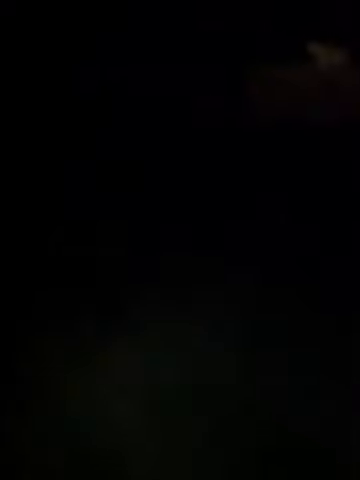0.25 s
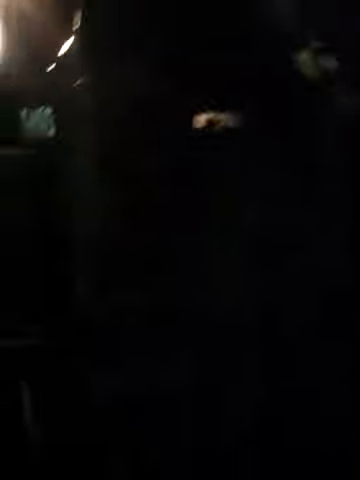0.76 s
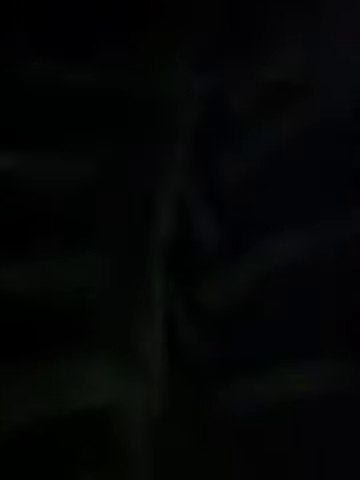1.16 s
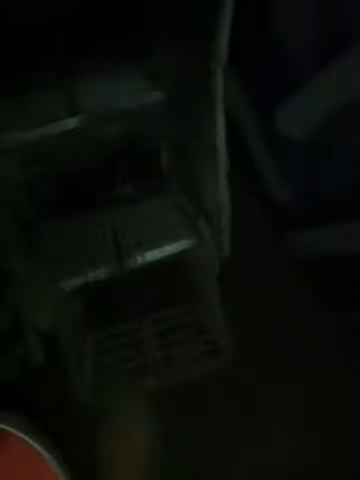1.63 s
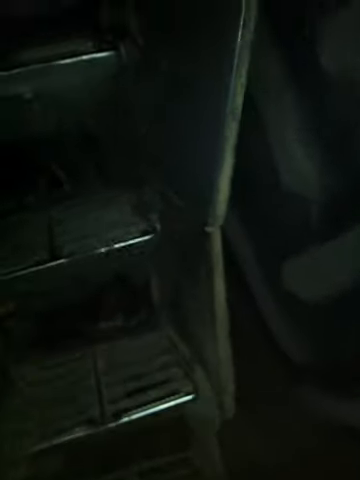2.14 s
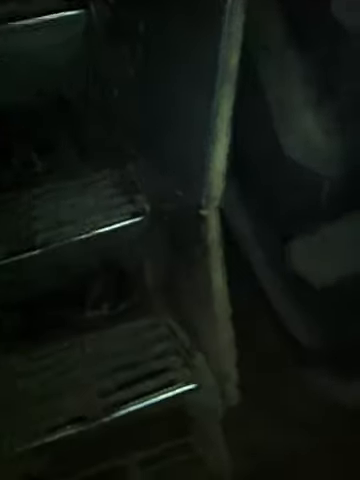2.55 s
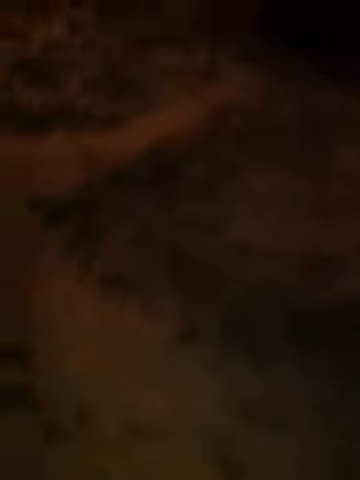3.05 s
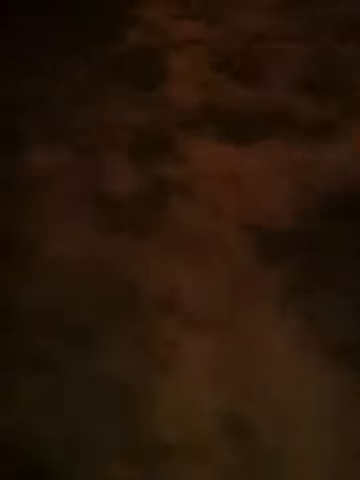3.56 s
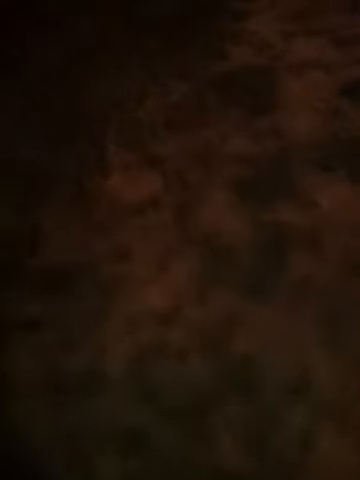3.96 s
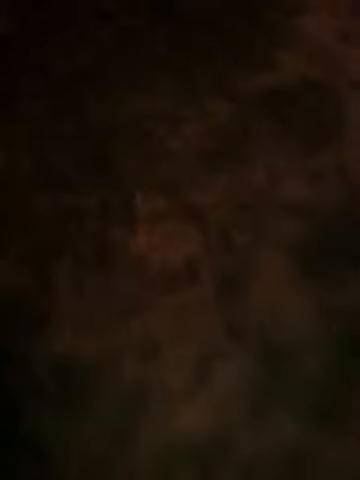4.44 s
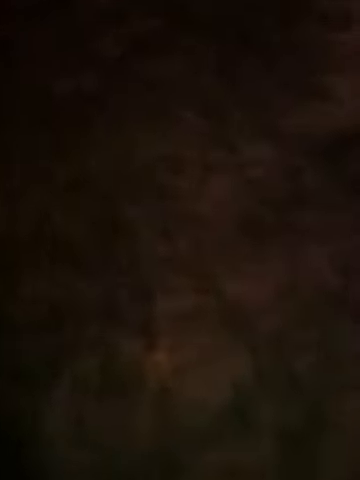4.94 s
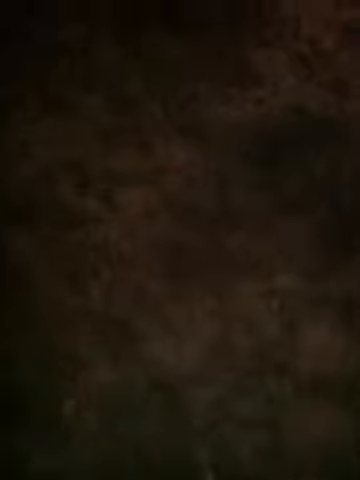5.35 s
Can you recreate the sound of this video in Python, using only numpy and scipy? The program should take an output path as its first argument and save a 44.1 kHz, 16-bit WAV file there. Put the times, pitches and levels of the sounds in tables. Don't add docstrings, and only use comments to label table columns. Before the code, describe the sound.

A diesel tractor hammers loudly up close with metallic clatter, drops to silence around three seconds, then fades back duller and speeds up.

```python
import sys
import numpy as np
from scipy import signal
from scipy.fft import rfft, irfft
from scipy.io import wavfile
from scipy.ndimage import uniform_filter1d

SR = 44100
rng = np.random.default_rng(int(sys.argv[2]) if len(sys.argv) > 2 else 0)


def generate_wav(signal):
    frames = np.transpose(np.atleast_2d(signal))
    scaled = np.clip(frames, -1, 1) * 32767
    pcm = np.round(scaled).astype(np.int16)
    wavfile.write(sys.argv[1], SR, pcm)


def nominal_scale(level):
    x = np.asarray(level, float) / 20
    return 10 ** x


N = 246958
BACK_S = 3.5915


def read(points, hz):
    f, value = np.transpose(points)
    return np.interp(np.log(hz + 1), np.log(f + 1), value, left=-80, right=-80)


def evened(x):
    return x / np.sqrt(np.mean(x ** 2) + 1e-20)


def drift(hz):
    z = rfft(rng.standard_normal(N))
    return evened(irfft(z / (1 + (np.fft.rfftfreq(N, 1 / SR) / hz) ** 2), N))


def roar(colour, patchy_db, wide_bins, long_frames):
    frames = N // 128 + 5
    a, b, patches = rng.standard_normal((frames, 257, 3)).T
    patches = uniform_filter1d(patches, wide_bins, 0)
    patches = evened(uniform_filter1d(patches, long_frames, 1))
    spectra = (a + 1j * b) * nominal_scale(patchy_db * patches)
    x = signal.istft(spectra, nperseg=512, noverlap=384)[1][:N]
    gain = nominal_scale(read(colour, np.fft.rfftfreq(N, 1 / SR)))
    return evened(irfft(rfft(x) * gain, N))


def tones(orders, turns, waver_db, blur_cycles):
    total = np.zeros(N)
    for order, db in orders:
        level = np.sqrt(2) * nominal_scale(db + waver_db * drift(6.7))
        total += level * np.cos(2 * np.pi * (order * turns + blur_cycles * drift(3.2)))
    return total


def bursts(turns, depth, decay_cycles, spread_db):
    strength = nominal_scale(spread_db * rng.standard_normal(400))[turns.astype(int)]
    burst = strength * np.exp(-((turns % 1) / decay_cycles) ** 2)
    burst = uniform_filter1d(burst, size=240)
    return evened(1 - depth + depth * burst / burst.mean())


def ringing(hz, db, width_hz, steady=0.4):
    r = np.exp(-np.pi * width_hz / SR)
    a, b = rng.standard_normal((N, 2)).T
    slow = a + 1j * b
    for _ in range(2):
        slow = signal.lfilter([1 - r], [1, -r], slow)
    slow = slow / (abs(slow) + 1e-9) ** steady
    return nominal_scale(db) * evened((slow * np.exp(2j * np.pi * np.cumsum(hz) / SR)).real)


def beside(ring, close):
    hz, more_hz, db, more_db = ring
    return hz + more_hz * close, db + more_db * close


def swell(t, start_s, length_s):
    k = np.clip(np.searchsorted(start_s, t) - 1, 0, None)
    phase = np.clip((t - start_s[k]) / length_s[k], 0, 1)
    return k, abs(np.sin(np.pi * phase))


def mudguard(turns, close, behind):
    hiss = ringing(np.full(N, 4940), -28 + 9 * (close - 0.5), width_hz=500, steady=0.1)
    return behind * hiss * bursts(turns + 0.77, 0.6, 0.62, 1.5)


def shakes(t):
    # (start [s], length [s], pitch [Hz], level [dB rms])
    events = [(.081, 0.021, 5850, -18.5), (.23, 0.024, 5830, -17.5), (.332, 0.014, 5680, -22.5),
              (.729, 0.016, 5470, -16.5), (.78, .02, 5000, -16), (.953, .02, 4520, -19.5),
              (1.38, .03, 4760, -16), (1.48, .02, 5640, -17), (2.149, 0.027, 4580, -14.5),
              (2.423, .02, 4770, -18), (2.595, .02, 4600, -20.5), (2.65, 0.059, 5200, -14),
              (2.745, .015, 4470, -19.5), (5.158, 0.022, 4980, -16)]
    start_s, length_s, hz, db = np.transpose(events)
    k, rise = swell(t, start_s, length_s)
    return np.sqrt(rise) * ringing(hz[k], db[k], 300)


def rattles(turns, view, behind):
    low_hz, high_hz = 4340, 6200
    pitch, size = rng.random((400, 2)).T
    cycle = (turns + 0.9).astype(int)
    hz = (low_hz + (high_hz - low_hz) * pitch)[cycle]
    strength = nominal_scale(2.8 * np.minimum(-np.log(size + 1e-6), 3.5))[cycle]
    shake = uniform_filter1d(strength * np.exp(-((turns + 0.9) % 1) / 0.5), size=110)
    buzz = drift(250) + 1j * drift(250)
    sheet = evened(shake * (buzz * np.exp(2j * np.pi * np.cumsum(hz) / SR)).real)
    return nominal_scale(-25 + 3.5 * (view - 1) - 3 * behind) * sheet


def gap(t):
    # (start [s], end [s], pitch [Hz], level [dB rms])
    places = [
        (.1, 1.3, 239.9, -20.5),
        (1.45, 2.95, 399.3, -25.5),
        (3.697, 4.95, 390.7, -25.5),
        (5.049, 5.7, 487, -22),
    ]
    start_s, end_s, hz, db = np.transpose(places)
    k, rise = swell(t, start_s, end_s - start_s)
    return rise ** 0.6 * ringing(hz[k], db[k], 30)


def hollow(close, behind):
    # (pitch far from the steps [Hz], gained beside them [Hz], level far [dB rms], gained [dB])
    ring = (316., 28., -22, 3.5)
    hz, db = beside(ring, close)
    return ringing(hz + 14 * drift(2.51), db - 3 * behind, 38)


def pump(close, behind):
    # (pitch far from the steps [Hz], gained beside them [Hz], level far [dB rms], gained [dB])
    ring = (175., 2.5, -40, 21)
    return ~behind * ringing(*beside(ring, close), 7.4)


def panel(turns, close):
    # (pitch far from the steps [Hz], gained beside them [Hz], level far [dB rms], gained [dB])
    ring = (1300.5, -8.5, -44.5, 26.5)
    return ringing(*beside(ring, close), 60) * bursts(turns + 0.87, 0.94, 0.4, 1.7)


def fan(turns):
    # (multiple of the firing rate, level [dB rms])
    orders = [(13., -33), (11.75, -40)]
    return tones(orders, turns, 6.2, 0.16)


def clatter(turns, view, behind):
    # (frequency [Hz], level [dB])
    beside_colour = [(3000, -6), (3800, -2), (4600, 1.5), (5600, -1), (6500, -5), (7400, -10.5),
                     (9000, -13)]
    behind_colour = [(3600, -8), (4300, -3), (4950, 2.5), (5500, 0.5), (6100, 1), (6800, -4), (7500, -12.5),
                     (9000, -8)]
    noise = np.where(behind, roar(behind_colour, 1.7, 6, 12), roar(beside_colour, 2.1, 6, 12))
    return nominal_scale(-19.5 + 7.5 * view) * noise * bursts(turns + 0.86, 0.54, 0.75, 2.7)


def block(turns, view, behind):
    # (frequency [Hz], level [dB])
    beside_colour = [(500, -33), (750, 1.5), (1100, -1), (1280, 3.5), (1500, 2), (2000, 1.5), (2700, -1),
                     (3300, -15), (4200, -32)]
    behind_colour = [(500, -23.5), (750, 3), (830, 3), (1100, 1.5), (1260, 2), (1600, 0.5), (2100, -3),
                     (2700, -7.5), (3400, -12.5), (4200, -23)]
    noise = np.where(behind, roar(behind_colour, 1.1, 4, 15), roar(beside_colour, 1.5, 4, 15))
    return nominal_scale(-12 + 0.5 * view) * noise * bursts(turns + 0.88, 0.4, 0.71, 1.0)


def body():
    # (frequency [Hz], level [dB])
    colour = [(110, -29.5), (160, -6), (230, -1.5), (330, -1.5), (450, -1.5), (650, -3), (900, -32.5)]
    return nominal_scale(-14.5) * roar(colour, 1.6, 2, 20)


def pipe(rate):
    return ringing(2.75 * rate, -28.5 + 0.44 * (rate - rate[0]), 19, steady=0.34)


def thrum():
    # (frequency [Hz], level [dB])
    colour = [(25, -0.5), (60, 0), (110, 10), (140, 2.5), (190, -18)]
    gas = nominal_scale(-26) * roar(colour, 1.4, 2, 30) * nominal_scale(3.5 * drift(2))
    return gas + nominal_scale(-16.5) * drift(44.5)


def exhaust(turns, behind):
    # (multiple of the firing rate, level [dB rms])
    orders = [(.5, -41), (1, -9.5), (1.5, -37.5), (2, -37.5), (3, -28.5), (4, -28), (6, -30.5), (8, -29.5),
              (10, -31.5)]
    return nominal_scale(-2.5 * behind) * tones(orders, turns, 0.59, 0.028)


def engine(t, behind):
    # (time [s], firing rate [1/s])
    speed = [
        (0, 40.15),
        (2.95, 40.15),
        (3.6, 40.8),
        (4.1, 42.2),
        (4.6, 44.8),
        (5.1, 48.4),
        (5.6, 51.),
    ]
    rate = np.interp(t, *np.transpose(speed))
    return rate, 0.9 + np.cumsum(rate) / SR - 0.278 * behind


def scene():
    # (time [s], overall level [dB], view of the engine block [0-1], closeness to the steps [0-1])
    walk = [(0, 0, 0, 0), (.6, 0.3, 0.32, .3), (.7, .3, .8, 0.35), (1.1, 0.6, .95, .5),
            (1.58, 0.8, 0.86, .7), (1.7, -1.2, .5, .8), (1.85, -0.2, 0.84, .85), (2.3, 1.4, 0.6, .98),
            (2.95, -0.7, 0.94, .75), (3.7, -1.5, 0.2, .4), (4.3, -2.5, 0.03, .55), (4.799, -3, 0.4, .6),
            (5.15, -1.5, .45, .6), (5.6, -2, .4, .62)]
    t = np.arange(N) / SR
    behind = t > BACK_S
    rate, turns = engine(t, behind)
    s, *columns = np.transpose(walk)
    level_db, view, close = (np.interp(t, s, c) for c in columns)

    rings = mudguard(turns, close, behind) + shakes(t) + gap(t) + hollow(close, behind)
    rings += pump(close, behind) + panel(turns, close) + pipe(rate)
    hum = rattles(turns, view, behind) + fan(turns) + exhaust(turns, behind)
    noise = clatter(turns, view, behind) + block(turns, view, behind) + body() + thrum()
    return (nominal_scale(level_db) * (noise + nominal_scale(-1) * hum) + rings)[None]


def highpass(x, order, hz):
    return signal.sosfilt(signal.butter(order, hz, btype="high", fs=SR, output="sos"), x)


def dropout(t):
    cut_s, trail_end_s = 2.9418, 3.012
    phase = np.clip((t - cut_s) / (trail_end_s - cut_s), 0, 1)
    trail = nominal_scale(-24) * np.cos(np.pi / 2 * phase) * (t < trail_end_s)
    fade = (t > BACK_S) * (1 - 0.87 * np.exp(-np.maximum(t - BACK_S, 0) / 0.19))
    return np.where(t < cut_s, 1, trail + fade)


def roll_off(x):
    return signal.sosfilt(signal.butter(12, 15830, fs=SR, output="sos"), x)


def record(dry):
    pinned = np.clip(dry, -0.78, 0.63)
    cut = highpass(highpass(pinned, 2, 110), 4, 70)
    held = np.clip(cut * dropout(np.arange(N) / SR), -0.7, 0.7)
    held = highpass(held, 1, 30)
    narrow = signal.firwin(numtaps=53, cutoff=7500, window=("kaiser", 6.0), fs=SR)
    band = signal.oaconvolve(held, narrow[None], "same")
    return roll_off(np.clip(band, -0.73, 0.73))


dry = scene()
out = record(dry)
generate_wav(out)
```